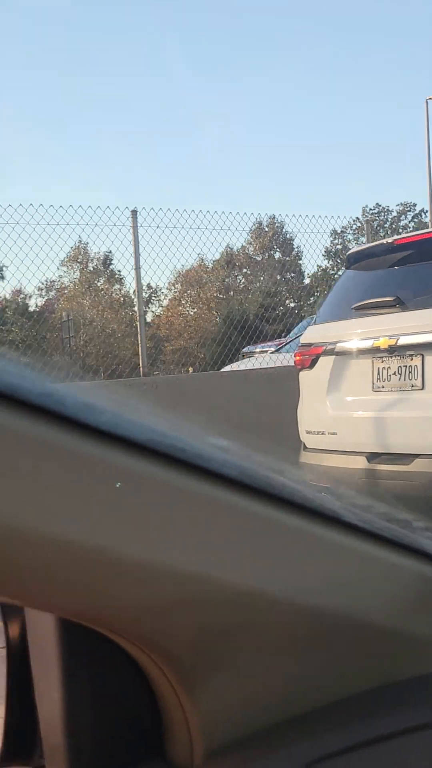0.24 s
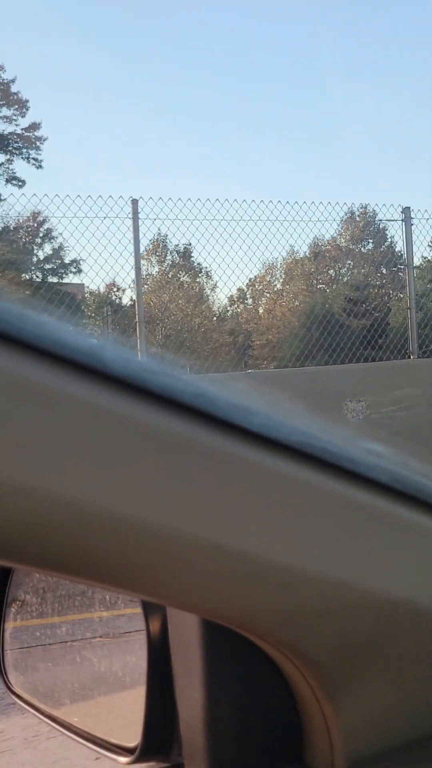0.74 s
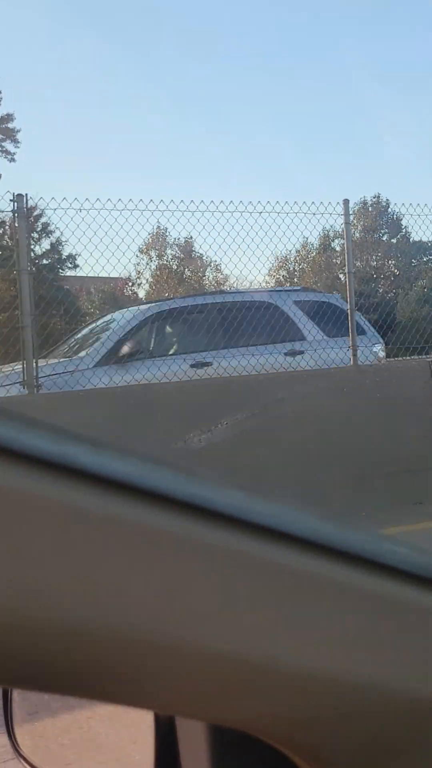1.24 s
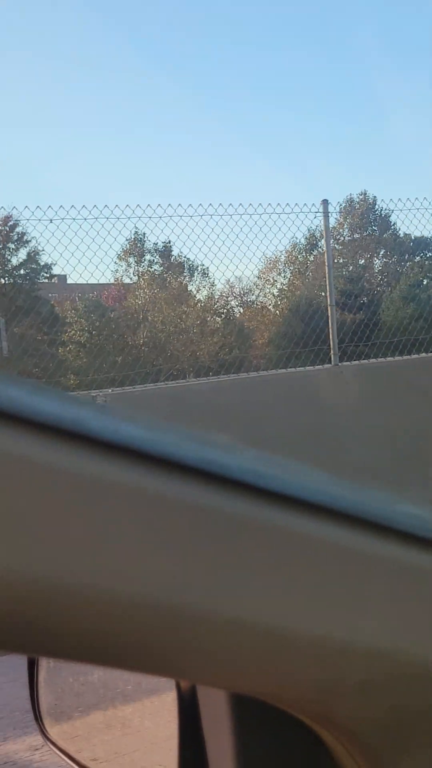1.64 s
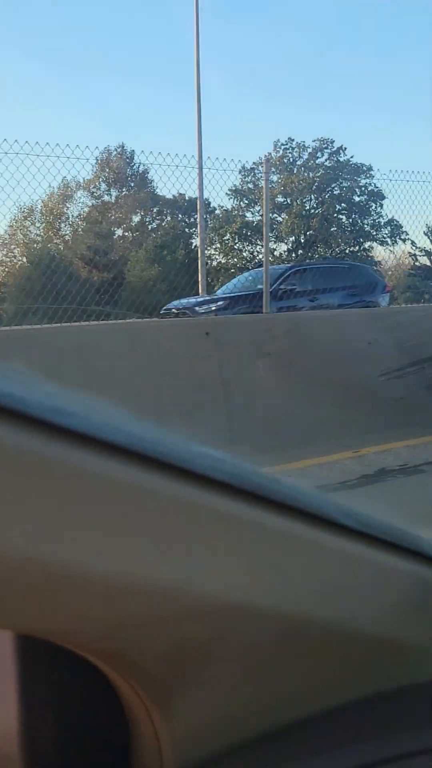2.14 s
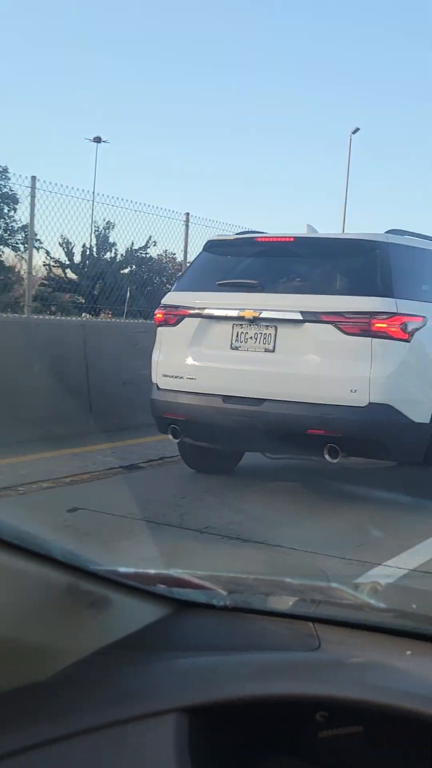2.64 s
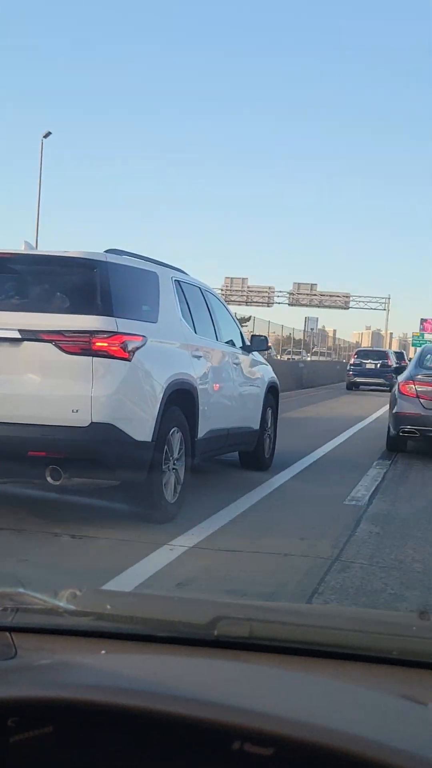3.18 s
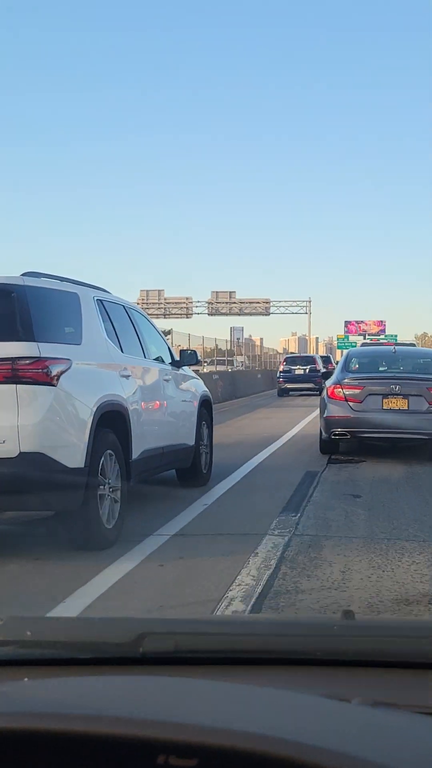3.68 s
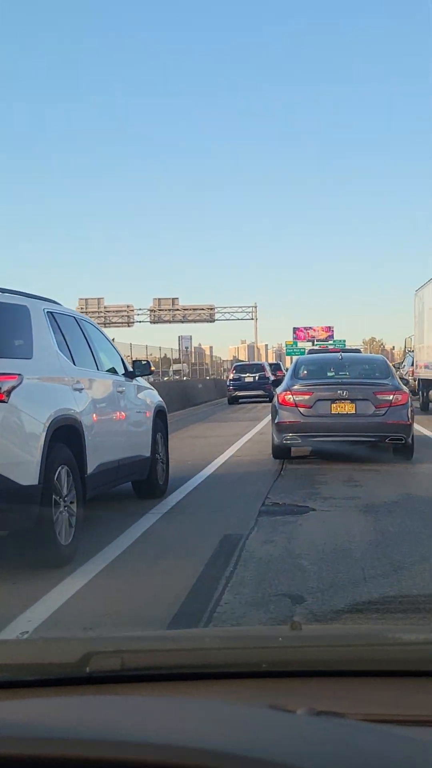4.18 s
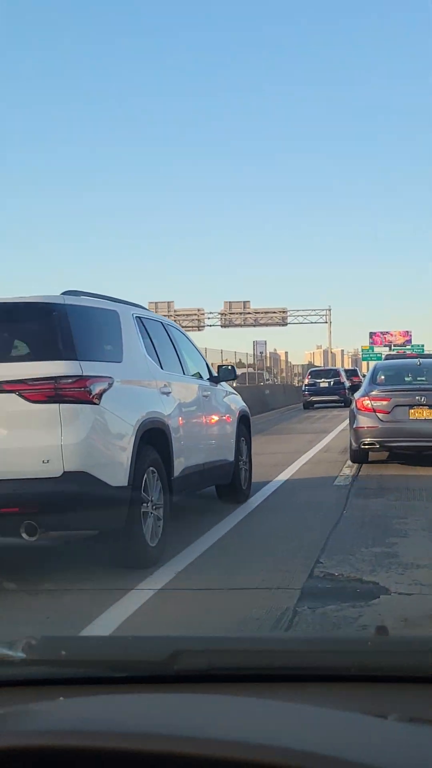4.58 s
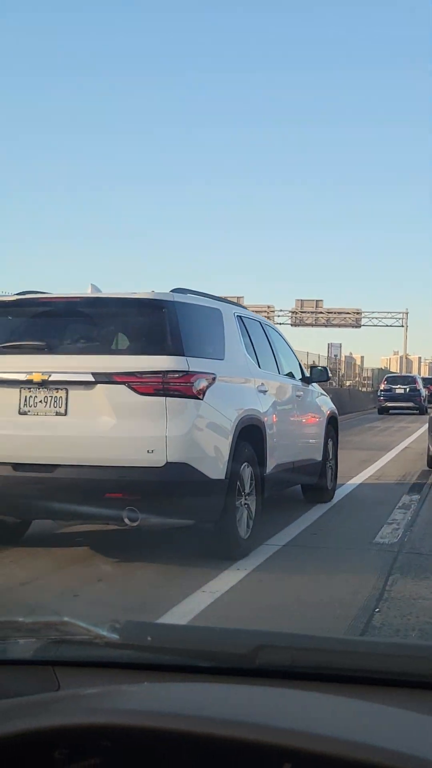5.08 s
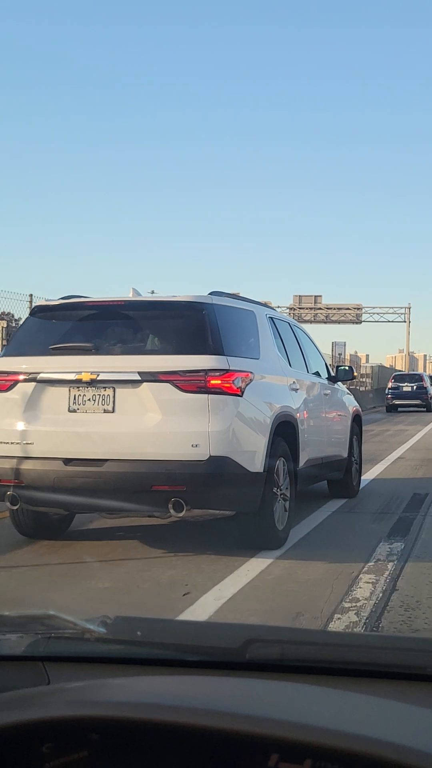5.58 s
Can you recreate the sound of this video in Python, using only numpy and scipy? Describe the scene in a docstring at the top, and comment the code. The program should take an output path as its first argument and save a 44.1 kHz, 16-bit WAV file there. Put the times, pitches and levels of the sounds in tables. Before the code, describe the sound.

Heard on a handheld phone inside a slowly moving car: constant bass-heavy rumble and muffled tyre roar with faint traffic hiss. Bumps thud through the body early on, strongest in a rattling cluster near two seconds, with small trim ticks. Afterwards the ride calms to softer, occasional boomy jolts.

```python
"""Boomy jolts and solid suspension knocks inside a car rolling slowly in dense highway traffic, over tyre
roar, the hiss of oncoming traffic and the ticks and knocks of loose trim; heard by a phone with two ports.
Boom, roar and hiss are cabin-coloured noise bands with level curves; bumps swell the boom.
Suspension knocks ring damped body modes; trim ticks are noise bursts, trim knocks damped sines;
narrow swells of resonant noise, short humming or hissing bands, rise and fade within the road noise."""
import sys
import numpy as np
from scipy import signal
from scipy.fft import rfft, irfft, next_fast_len
from scipy.io import wavfile
from scipy.ndimage import uniform_filter1d, minimum_filter1d, map_coordinates

SR = 44100
rng = np.random.default_rng(int(sys.argv[2]) if len(sys.argv) > 2 else 0)


def digitize_waveform(pressure):
    """Quantize a signal to 16-bit integers and store it at the path in sys.argv[1].

    Rows of a 2-D input are taken as channels; values are limited to [-1, 1].
    """
    field = np.atleast_2d(pressure).T
    bounded = np.clip(field, -1, 1)
    quanta = np.round(bounded * 32767).astype(np.int16)
    wavfile.write(sys.argv[1], SR, quanta)


N = 256662
SIZE = next_fast_len(N + 4096)   # padded transform length
HZ = np.maximum(np.arange(SIZE // 2 + 1) * SR / SIZE, 1)

# Bumps and joints under the wheels. Each row: time of the jolt's top in seconds, hold in seconds,
# deep boom in dB, upper boom in dB, panel drumming in dB.
BUMPS = [(.0, 0.0028, -14.5, -39, -45), (0.192, 0.04, -15.5, -19.5, -36), (0.518, 0.046, -24, -12.5, -31.5),
         (0.631, 0.021, -17, -42, -49), (0.906, 0.032, -15.5, -23, -39.5), (1.0, 0.035, -20.5, -40, -51),
         (1.396, 0.0074, -20.5, -30, -44), (1.637, 0.037, -19, -26, -44), (1.79, 0.0061, -15, -21, -52),
         (1.867, 0.034, -16.5, -17, -35), (1.942, 0.034, -12.5, -25, -29.5),
         (2.032, 0.024, -17.5, -29, -34), (2.257, 0.056, -13, -21, -33), (2.383, 0.0092, -17.5, -24, -42),
         (2.525, 0.009, -19, -43, -48), (2.884, 0.0063, -28, -39, -44), (3.23, 0.062, -34, -25, -46),
         (3.44, 0.022, -19, -33, -41), (3.74, 0.015, -23, -27.5, -47), (3.884, 0.018, -22, -23.5, -53),
         (4.592, .01, -23, -36, -45), (5.323, 0.025, -25, -24, -53), (5.758, 0.015, -21, -26, -44)]
# Road coarseness between bumps. Each row: time in seconds, deep boom, upper boom, panel drumming in dB.
ROAD_COARSENESS = [(0, -24, -24, -37.5), (.8, -24.5, -24.5, -38.5), (1.3, -25.5, -23.5, -36.5),
                   (1.8, -23.5, -27.5, -41), (2.7, -26, -27, -38.5), (3.3, -26, -27.5, -40.5),
                   (4.3, -24.5, -28, -39.5), (5.0, -23.5, -26.5, -41.5), (5.26, -26.5, -27.5, -41),
                   (5.45, -22.5, -26, -41.5), (5.7, -30.5, -31, -44), (5.82, -37, -28, -39)]
# Suspension knocks. Each row: time in seconds, strength in dB, contact time in seconds.
THUDS = [(.178, -6.5, 0.0062), (0.21, -20, 0.0021), (0.241, -31.5, 0.0018), (0.493, -16, 0.0044),
         (0.539, -16, 0.00092), (0.563, -18.5, 0.001), (.886, -19, 0.004), (0.911, -12, 0.0049),
         (0.957, -21, .002), (1.865, -8, 0.0012), (1.897, -11, 0.0011), (1.936, -16, 0.0017),
         (1.972, -12.5, 0.0016), (2.017, -4, 0.011), (2.265, -19.5, 0.0014), (2.314, -14, 0.001),
         (2.884, -28, 0.0036), (3.879, -29.5, 0.0055), (3.904, -19, 0.004)]
# Body modes when struck. Each row: frequency in Hz, mean level in dB, t60 in seconds.
BODY_MODES = [(49, 3, 0.17), (73, 1.5, 0.18), (101, -12, 0.13), (140, 1, 0.19), (182, -11.5, 0.075),
              (303, -10.5, 0.15), (336, -29, .06), (480, -13, 0.066), (640, -17.5, .05)]
# Tyres and traffic. Each row: time in seconds, tyre roar, tread song, wash of passing traffic, hiss,
# top treble in dB.
TRAFFIC = [(0, -36.5, -35, -41.5, -50, -61), (.12, -35.5, -36, -48, -56, -62),
           (.45, -35.5, -38, -49.5, -58.5, -64.5), (.75, -36.5, -37, -50, -59, -66.5),
           (1.0, -35.5, -34.5, -48.5, -58.5, -66), (1.13, -34, -35.5, -46.5, -58.5, -68),
           (1.3, -37.5, -35.5, -43.5, -58.5, -65.5), (1.42, -34.5, -36.5, -44, -57, -65.5),
           (1.6, -38, -35.5, -44.5, -58.5, -67), (1.83, -40.5, -36, -45.5, -60, -67),
           (2.0, -39, -36.5, -46.5, -58.5, -67), (2.4, -41.5, -38, -51, -61, -70),
           (2.6, -37, -39.5, -50, -61, -70), (3.0, -35, -36.5, -50, -61, -69),
           (3.07, -38.5, -38.5, -48.5, -57, -65), (3.18, -35.5, -35, -48.5, -59.5, -66),
           (3.31, -34.5, -34.5, -47.5, -54.5, -63), (3.43, -37.5, -35, -47.5, -59.5, -64.5),
           (3.63, -33.5, -38.5, -48, -60, -67), (3.81, -38.5, -36.5, -50, -59, -67),
           (4.15, -36.5, -38.5, -50, -60.5, -67.5), (4.33, -38, -39, -47.5, -60.5, -67),
           (4.64, -35, -38.5, -51, -60, -65.5), (5.15, -40, -35.5, -51, -59, -65),
           (5.35, -40.5, -38, -54, -62, -66.5), (5.82, -41.5, -40, -53, -62, -69)]
# The phone is turned in the hand. Each row: time in seconds, left minus right of tread, wash and hiss in dB,
# added left lag in ms.
PHONE_TURN = [(0, -3, -2, 2, 0.017), (.5, -4.5, -2, -1, 0.035), (.85, -3.5, -3, -1.5, -0.0022),
              (1.2, 0, 0.5, -1, 0.037), (1.5, 1.5, 2, 0.5, 0.057), (1.85, -0.5, 2, 2, 0.027),
              (2.2, 1.5, 2.5, 1, 0.0059), (2.6, 0, .3, 0, -.01), (3.15, -.4, -0.5, -0.5, 0.012),
              (3.6, 1.5, 1, 1.2, -0.0075), (4.5, 0, -0.5, -.8, 0.019), (5.1, .6, 0.5, 0, -0.027),
              (5.82, 0, 0, -0.5, -0.0088)]
# Noise colours before the cabin lift. Each row: frequency in Hz, relative level in dB per Hz.
DEEP_COLOUR = [(11, -41), (22, -7), (32, -0.5), (44, 0.5), (70, 1.5), (100, -6.5), (130, -14), (170, -26.5),
               (290, -120)]
UPPER_COLOUR = [(59, -3.5), (100, -6), (140, -4), (167, -8.5), (233, -11.5), (280, -20.5), (360, -62),
                (620, -120)]
PANEL_COLOUR = [(150, -10.5), (260, -6.5), (312, -9.5), (350, -5), (465, -12), (600, -50), (1020, -120)]
ROAR_COLOUR = [(370, -62), (630, -11.5), (719, -5), (780, -6), (1030, -12.5), (1340, -15.5), (2270, -120)]
DRONE_COLOUR = [(270, -31), (460, -1.5), (554, 11), (635, -2.5), (830, -33), (1400, -120)]
TREAD_COLOUR = [(590, -25), (1000, -4), (1250, -5.5), (1390, -4.5), (1790, -7), (2100, -15.5), (2730, -31),
                (4620, -120)]
WASH_COLOUR = [(1180, -49), (2000, 2), (2290, 0.5), (4200, -10), (5460, -51), (9240, -120)]
HISS_COLOUR = [(2410, -26), (4100, -2), (4490, -2), (5390, -4), (7120, -15.5), (7800, -23.5), (10100, -58),
               (17200, -120)]
AIR_COLOUR = [(6500, -44), (7600, -27), (8300, -7), (9270, 0.5), (10900, -3.5), (12600, 0), (15000, -2.5),
              (16500, -9), (18000, -20)]
# Cabin and panel resonances. Each row: frequency in Hz, width in Hz, lift in dB.
CABIN_RESONANCES = [(42, 9, 4.5), (113.6, 20, -0.5), (140.6, 17, 7.5), (159, 12, -2.5), (194.7, 30.6, 6.5),
                    (236, 8.4, 6.5), (285, 61, 2.5), (344, 28, -0.5), (544, 38, -4), (715, 23, 4),
                    (877, 146, 8.5), (1100, 74, 4), (1239, 47, 7.5), (1633, 190, 3.5), (1850, 77, 2.5),
                    (2680, 100, 2.5), (3200, 220, 2), (4540, 91, 2.5), (4830, 150, 1.5), (5230, 150, 1)]
# Narrow swells of resonant noise. Each row: start in seconds, length in seconds,
# frequency in Hz, width of each of two resonances in Hz, level in dB, left minus right in dB.
SWELLS = [(.00, 0.22, 813, 89, -42, 6), (.00, 0.32, 4400, 1400, -59, -7), (0.165, 0.15, 5600, 150, -68, -6),
          (0.363, 0.34, 137, 10.3, -25.5, 0), (0.442, 0.17, 286, 37, -37, -2.5),
          (.45, 1, 851, 50, -44.5, 0), (0.879, 0.27, 45, 12, -21.5, 0), (0.921, 0.56, 228.4, 7.9, -35, 0),
          (1.045, 0.23, 349, 15, -42, -1), (1.116, 0.61, 4500, 670, -63, -11),
          (1.153, 0.22, 718, 27, -41, -1), (1.238, 0.15, 4550, 800, -56, -9),
          (1.215, .20, 2810, 800, -50.5, 1), (1.37, 0.65, 140, 16, -28, 0.5),
          (1.38, 0.29, 1200, 61, -40.5, 12.5), (1.55, 0.53, 857, 60, -40, 0),
          (1.623, 0.36, 1238, 48, -43, 16), (1.817, 0.21, 640, 140, -39, -2),
          (1.846, .15, 515, 210, -38, 0), (2.60, 0.25, 238, 9, -33, 0), (2.598, 0.58, 883, 40, -42.5, 2),
          (2.95, 0.51, 51.8, 10.4, -22.5, 0.5), (3.00, 0.32, 142.5, 13, -32, -1),
          (3.001, 0.46, 558, 130, -39.5, 2), (3.019, .38, 5150, 840, -61, -12),
          (3.098, 0.43, 726, 38, -40.5, 2), (3.102, 0.38, 84.5, 12, -30, 0),
          (3.049, 0.6, 237.5, 7.6, -35.5, -0.5), (3.453, .16, 362, 13, -42, -2),
          (3.14, .26, 12500, 1800, -69, -9), (3.548, 0.47, 910, 82, -39.5, 5),
          (3.682, 0.42, 42.5, 9, -26.5, -.5), (4.101, 0.33, 1240, 47, -42.5, 2),
          (4.20, 0.22, 140.6, 7.9, -29, -1), (4.304, 0.34, 731, 12, -39.5, -1),
          (4.33, 0.17, 802, 25, -38.5, 6), (4.399, 0.57, 556, 120, -43, 2), (4.499, 0.64, 885, 35, -43, 4),
          (4.555, 0.22, 139, 15, -28.5, 0), (5.05, 0.2, 141, 9.2, -28.5, 0.5),
          (4.75, 0.28, 199, 14, -33, 1), (5.255, 0.28, 139.2, 11, -26, 1),
          (5.279, 0.19, 87.6, 14, -26.5, 0), (5.658, 0.34, 42, 10, -21, 1)]
# Trim ticks. Each row: time in seconds, drive level in dB, loudest pitch in Hz, rattle decay in seconds,
# duller slap over the drive level in dB.
TICKS = [(0.025, -50, 5000, .012, 3), (.138, -46, 6500, 0.0087, 10), (.3067, -46, 11500, .004, -15),
         (0.512, -42, 12500, .0015, -11), (.5844, -53, 11000, .004, -15), (1.863, -38, 13000, 0.0083, 12.5),
         (1.878, -52, 12000, .012, -10), (1.96, -49, 10000, 0.014, 15), (1.981, -38.5, 13000, 0.0025, 14),
         (1.987, -45, 13000, .006, 11), (2.0494, -56, 9000, .006, -15), (2.249, -51, 11000, .015, 13),
         (2.262, -55, 12000, .015, 12), (2.2985, -45, 12500, 0.002, 2)]
# Short rings of panels and trim. Each row: time in seconds, drive level in dB, pitch in Hz, decay in seconds.
KNOCKS = [(.060, -46, 4460, .004), (.073, -40.5, 5150, 0.005), (.079, -48, 5300, .004),
          (.141, -32, 5780, 0.003), (.736, -16.5, 863, 0.0053), (1.566, -17, 1195, 0.0062),
          (1.61, -12, 1090, 0.004), (2.257, -47, 5370, 0.003), (3.672, -16.5, 945, 0.0039),
          (4.205, -20, 1115, 0.0069), (5.096, -11, 1030, 0.0023)]
# Likeness of the two ports. Each row: frequency in Hz, shared share of power (0 to 1).
PORT_LIKENESS = [(40, 0.98), (130, 1), (250, 1), (500, 0.92), (1000, 0.84), (2000, 0.66), (4000, 0.23),
                 (8000, 0.27), (15000, .12)]
# Port balance. Each row: frequency in Hz, left minus right in dB.
PORT_BALANCE = [(60, 0), (300, -0.5), (500, 1), (770, 2.5), (1170, 1), (1790, 0), (2740, 2), (4190, -5.5),
                (5500, -5.5), (6800, -11), (8000, -19.5), (9500, -14.5), (12000, -9), (15000, -6)]

# deep, upper, panels
JOLT_RISE_DB_PER_S, JOLT_FALL_DB_PER_S = [314, 295, 326], [161, 220, 263]
DRONE_MEAN_DB, DRONE_ROAR_SHARE = -42.5, 0.47   # share of the roar's swing in dB
SWELL_POWER = 0.76   # small is blunt, large is pointed
SLAP_HZ, SLAP_Q = 3570, 1.7
TICK_RISE_SHARE = 0.25   # of the rattle decay
KNOCK_RISE_S = 0.0033
PORT_DIP_HZ, PORT_DIP_Q = 7800, 4.0
LEFT_LAG_S = 0.00011
MIC_LOW_HZ, CUTOFF_HZ = 10.6, 15740
CEILING = .72


def amp(db):
    """dB to gain."""
    return 10 ** (np.asarray(db) / 20)


def rms_one(x):
    """Scale to rms 1."""
    return x / np.sqrt(np.mean(x ** 2) + 1e-20)


def mid_rms_one(x):
    """Scale a stereo layer until its left-right mean has rms 1."""
    return x / np.sqrt(np.mean(x.mean(axis=0) ** 2))


def in_time(rows):
    """Columns of a curve table, one value a sample."""
    time_s, *columns = np.transpose(rows)
    return [np.interp(np.arange(N) / SR, time_s, column) for column in columns]


def at_hz(points):
    """A (Hz, value) table on the frequency grid, straight in log frequency."""
    hz, value = np.transpose(points)
    return np.interp(np.log(HZ), np.log(hz), value)


def drift(rate_hz):
    """Slow random wander of rms 1: noise through a double-pole lowpass, made every 40 samples."""
    pole = np.exp(-2 * np.pi * rate_hz * 40 / SR)
    noise = rng.standard_normal(N // 40 + 2002)
    slow = signal.lfilter([1], [1, -2 * pole, pole * pole], noise)[2000:]
    return np.interp(np.arange(N) / 40, np.arange(len(slow)), rms_one(slow))


def at_ports(shared, own):
    """Port spectra: a shared part late at the left, plus a part of its own in each port."""
    alike = np.clip(at_hz(PORT_LIKENESS), 0, 1)
    late = np.array([np.exp(-2j * np.pi * HZ * LEFT_LAG_S), np.ones(len(HZ))])
    balance = amp(np.outer([.5, -.5], at_hz(PORT_BALANCE)))
    return balance * (np.sqrt(alike) * late * shared + np.sqrt(1 - alike) * own)


def cabin_noise(colour, patchy_db, flicker_hz, count):
    """Stereo noise coloured by the cabin, in overlapping bands that each waver in level; mid rms 1."""
    lift_db = sum(db / (1 + (2 * (HZ - hz) / width) ** 2) for hz, width, db in CABIN_RESONANCES)
    white = rfft(rng.standard_normal((3, SIZE)))
    low_hz, high_hz = colour[0][0], colour[-1][0]
    inside = (HZ > low_hz) & (HZ < high_hz)
    coloured = at_ports(white[0], white[1:]) * amp(at_hz(colour) + lift_db) * inside
    place = np.interp(np.log(HZ), np.log([low_hz, high_hz]), [0, count - 1])
    out = np.zeros((2, N))
    for k in range(count):
        band = coloured * np.maximum(1 - abs(place - k), 0)
        out += amp(patchy_db * drift(flicker_hz)) * irfft(band, SIZE)[:, :N]
    return mid_rms_one(out)


def steadied(x, span_s, share):
    """Takes part of the random swelling out of narrow noise by dividing by its short-term power."""
    power = uniform_filter1d(x.mean(axis=0) ** 2, round(span_s * SR))
    return mid_rms_one(x / (power + 0.04) ** (share / 2))


def turned(x, pan_db, lag_ms):
    """Tilts a stereo layer and shifts its left side in time."""
    left = map_coordinates(x[0], [np.arange(N) - lag_ms * SR / 1000], order=3, mode="nearest")
    return np.array([left * amp(pan_db / 2), x[1] * amp(-pan_db / 2)])


def jolts():
    """Gains of deep boom, upper boom and panels: steady road shaking plus every bump, added in power."""
    t, power = np.arange(N) / SR, amp(in_time(ROAD_COARSENESS)) ** 2
    for s, hold_s, *top_db in BUMPS:
        near = slice(max(round((s - .15) * SR), 0), round((s + .5) * SR))
        since_s = t[near] - s
        rise_loss_db = np.outer(JOLT_RISE_DB_PER_S, np.maximum(-since_s, 0))
        fall_loss_db = np.outer(JOLT_FALL_DB_PER_S, np.maximum(since_s - hold_s, 0))
        power[:, near] += amp(np.c_[top_db] - rise_loss_db - fall_loss_db) ** 2
    return np.sqrt(power)


def body_boom():
    """Shaken body: two bands of cabin boom and panel drumming, driven by the jolts."""
    deep_gain, upper_gain, panel_gain = jolts()
    deep = cabin_noise(DEEP_COLOUR, patchy_db=2.0, flicker_hz=4.3, count=3)
    deep = steadied(deep, span_s=0.0345, share=0.84)
    upper = cabin_noise(UPPER_COLOUR, patchy_db=2.0, flicker_hz=5.5, count=6)
    upper = steadied(upper, span_s=0.078, share=0.098)
    panels = cabin_noise(PANEL_COLOUR, patchy_db=0.9, flicker_hz=7.9, count=3)
    return deep_gain * deep + upper_gain * upper + panel_gain * panels


def thuds():
    """Suspension knocks: a soft push strikes every body mode with a random strength of its own."""
    length = 13230
    out, t = np.zeros(SIZE + length), np.arange(length) / SR
    spreads = rng.standard_normal((len(THUDS), len(BODY_MODES)))
    for (s, db, contact_s), spread in zip(THUDS, spreads):
        ring = np.zeros(length)
        for (hz, mode_db, t60_s), z in zip(BODY_MODES, spread):
            ring += amp(mode_db + 2 * z - 60 * t / t60_s) * np.sin(2 * np.pi * hz * t)
        push = np.hanning(round(2 * contact_s * SR))
        at = round(s * SR)
        out[at:at + length] += amp(db) * signal.fftconvolve(ring, push / push.sum())[:length]
    spectrum = rfft(out[:SIZE])
    return irfft(at_ports(spectrum, spectrum), SIZE)[:, :N]


def tyres(roar_db, tread_db, tread_pan_db, lag_ms):
    """Tyre noise through the panels: roar, a drone that partly follows it, and tread song."""
    drone_db = DRONE_MEAN_DB + DRONE_ROAR_SHARE * (roar_db - roar_db.mean())
    roar = cabin_noise(ROAR_COLOUR, patchy_db=2.0, flicker_hz=11.3, count=6)
    drone = cabin_noise(DRONE_COLOUR, patchy_db=0.0, flicker_hz=3.3, count=2)
    tread = cabin_noise(TREAD_COLOUR, patchy_db=1.26, flicker_hz=15.0, count=6)
    return amp(roar_db) * roar + amp(drone_db) * drone + amp(tread_db) * turned(tread, tread_pan_db, lag_ms)


def outside_traffic(wash_db, hiss_db, air_db, wash_pan_db, hiss_pan_db, lag_ms):
    """Traffic past the windows: wash and hiss that shift with the phone, and top treble that does not."""
    wash = cabin_noise(WASH_COLOUR, patchy_db=1.3, flicker_hz=12.0, count=7)
    hiss = cabin_noise(HISS_COLOUR, patchy_db=1.5, flicker_hz=9.6, count=6)
    air = cabin_noise(AIR_COLOUR, patchy_db=0.8, flicker_hz=16.0, count=3)
    moving = amp(wash_db) * turned(wash, wash_pan_db, lag_ms) + amp(hiss_db) * turned(hiss, hiss_pan_db, lag_ms)
    return moving + amp(air_db) * air


def swells():
    """Short humming or hissing bands: noise through a resonance twice, rising and falling smoothly."""
    out, run_in = np.zeros((2, N + SR)), SR // 5
    noises = rng.standard_normal((len(SWELLS), 3, SR + run_in))
    for (s, length_s, hz, width_hz, db, pan_db), noise in zip(SWELLS, noises):
        size, at = int(length_s * SR), round(s * SR)
        b, a = signal.iirpeak(hz, hz / width_hz, fs=SR)
        own_gain = np.sqrt(1 - np.interp(hz, *np.transpose(PORT_LIKENESS)))
        stereo = (noise[0] + own_gain * noise[1:])[:, :run_in + size]
        tone = signal.lfilter(b, a, signal.lfilter(b, a, stereo))[:, run_in:]
        tone = steadied(rms_one(tone), span_s=1 / width_hz, share=0.85)
        arch = np.sin(np.pi * np.arange(size) / size) ** SWELL_POWER
        out[:, at:at + size] += amp(db + np.array([[pan_db], [-pan_db]]) / 2) * arch * tone
    return out[:, :N]


def ticks():
    """Trim ticks: fast-dying bright noise, peaked at its own pitch, plus a duller slap."""
    length = 4410
    out, t = np.zeros((3, SIZE)), np.arange(length) / SR   # shared, left, right
    noises = rng.standard_normal((len(TICKS), 3, length))
    bright = signal.butter(2, 3000, "high", fs=SR, output="sos")
    slap_peak = signal.iirpeak(SLAP_HZ, SLAP_Q, fs=SR)
    for (s, db, hz, decay_s, slap_db), noise in zip(TICKS, noises):
        pitched = signal.lfilter(*signal.iirpeak(hz, 3.0, fs=SR), noise)
        slap = signal.lfilter(*slap_peak, noise)
        burst = signal.sosfilt(bright, 0.2 * noise + pitched) + amp(slap_db) * slap
        envelope = (1 - np.exp(-t / (TICK_RISE_SHARE * decay_s))) * np.exp(-t / decay_s)
        at = round(s * SR)
        out[:, at:at + length] += amp(db) * burst * envelope
    spectra = rfft(signal.lfilter(*signal.iirnotch(PORT_DIP_HZ, PORT_DIP_Q, fs=SR), out))
    return irfft(at_ports(spectra[0], spectra[1:]), SIZE)[:, :N]


def knocks():
    """Dull knocks and thin squeaks of panels and trim: short damped sines with a soft start."""
    length = 4410
    out, t = np.zeros(SIZE), np.arange(length) / SR
    for s, db, hz, decay_s in KNOCKS:
        envelope = (1 - np.exp(-t / KNOCK_RISE_S)) * np.exp(-t / decay_s)
        at = round(s * SR)
        out[at:at + length] += amp(db) * np.sin(2 * np.pi * hz * t) * envelope
    spectrum = rfft(out)
    return irfft(at_ports(spectrum, spectrum), SIZE)[:, :N]


def scene():
    """Boom and knocks of the body, tyres, traffic outside, swells and trim, summed."""
    roar_db, tread_db, wash_db, hiss_db, air_db = in_time(TRAFFIC)
    tread_pan_db, wash_pan_db, hiss_pan_db, lag_ms = in_time(PHONE_TURN)
    body = body_boom() + thuds()
    rolling = tyres(roar_db, tread_db, tread_pan_db, lag_ms)
    outside = outside_traffic(wash_db, hiss_db, air_db, wash_pan_db, hiss_pan_db, lag_ms)
    return body + rolling + outside + swells() + ticks() + knocks()


def record(dry):
    """Phone: deepest bass lost, a limiter easing gain down around the tallest peaks, top cut steeply."""
    dry = signal.lfilter(*signal.butter(1, MIC_LOW_HZ, "high", fs=SR), dry)
    allowed = np.minimum(CEILING / (abs(dry).max(axis=0) + 1e-9), 1)
    gain = uniform_filter1d(minimum_filter1d(allowed, size=883), size=881)   # 20 ms windows
    top_cut = signal.ellip(12, .3, 80, CUTOFF_HZ, fs=SR, output="sos")
    return signal.sosfilt(top_cut, gain * dry)


dry = scene()
out = record(dry)
digitize_waveform(out)
```